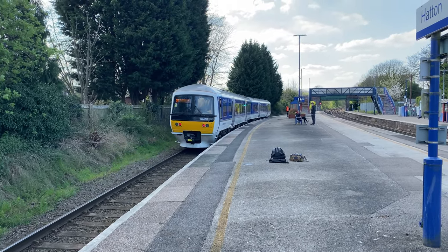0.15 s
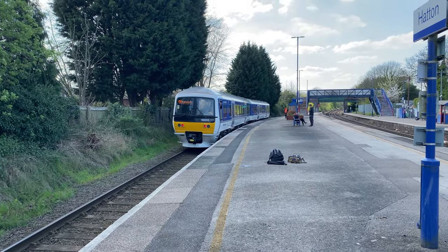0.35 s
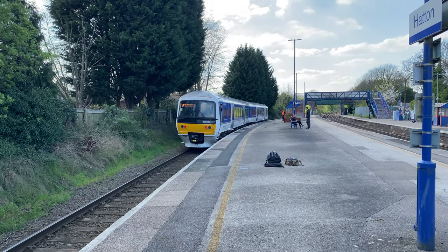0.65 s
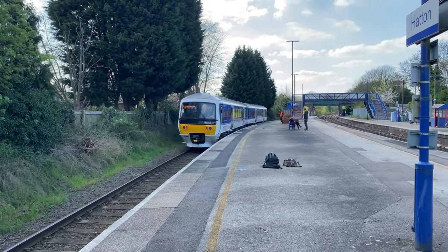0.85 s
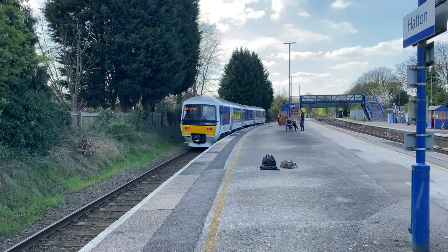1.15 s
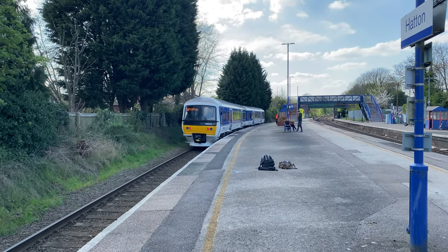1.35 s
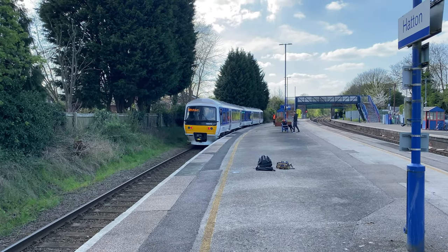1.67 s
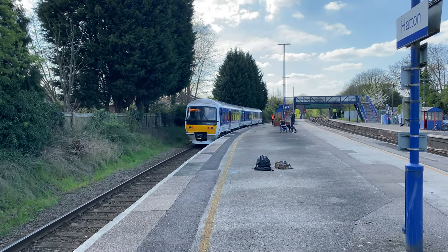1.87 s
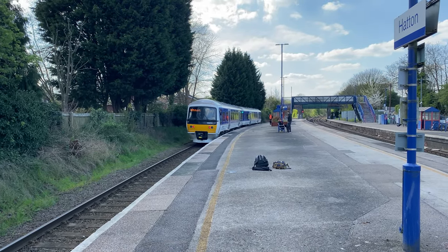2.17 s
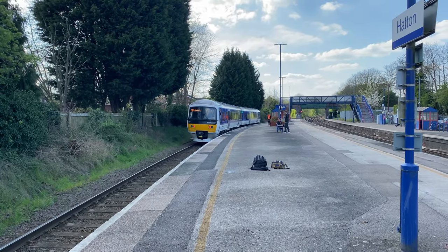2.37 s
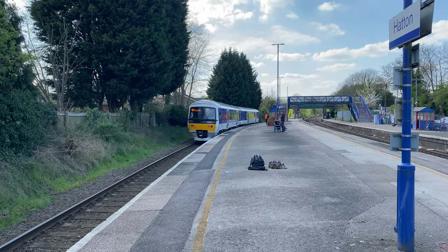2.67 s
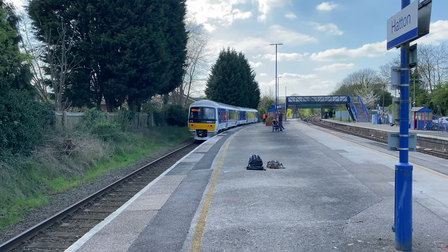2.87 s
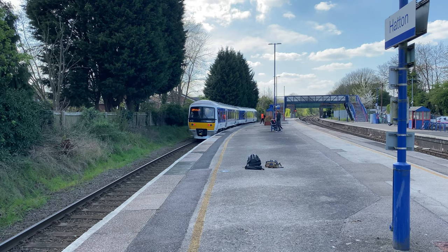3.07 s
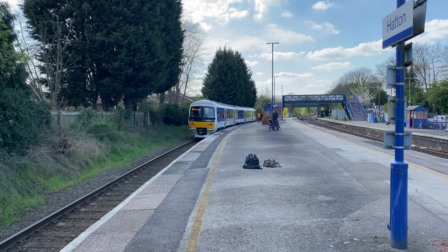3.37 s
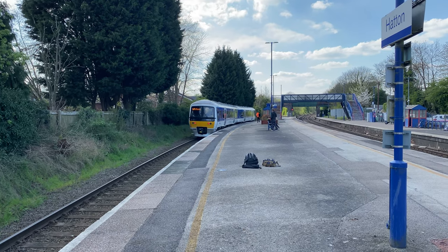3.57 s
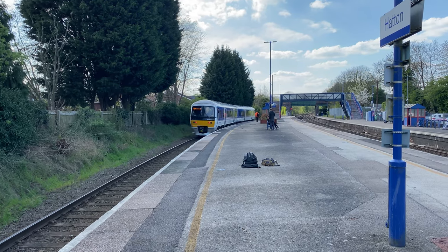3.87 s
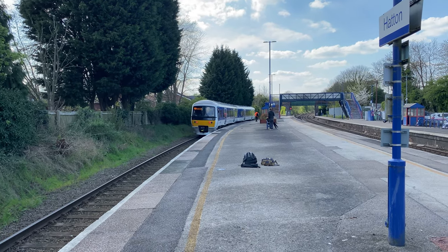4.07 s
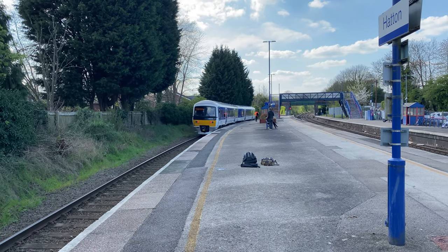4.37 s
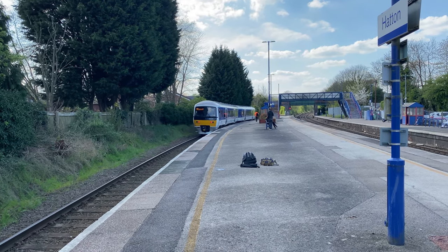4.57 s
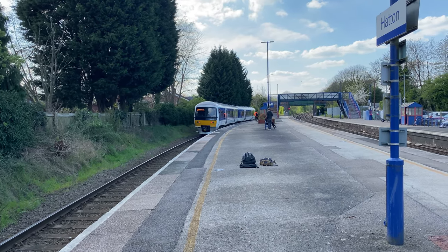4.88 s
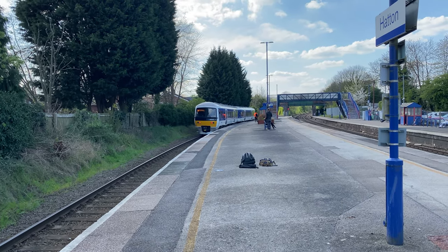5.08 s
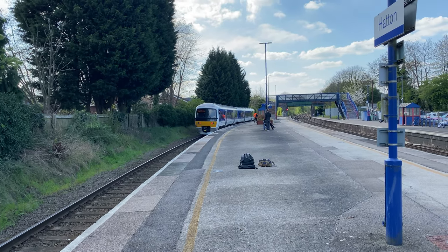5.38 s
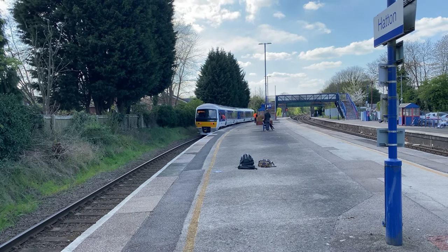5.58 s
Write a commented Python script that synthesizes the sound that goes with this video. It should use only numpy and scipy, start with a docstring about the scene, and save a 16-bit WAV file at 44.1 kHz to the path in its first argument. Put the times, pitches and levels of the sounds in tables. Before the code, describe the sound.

Outdoors on a country station platform, a diesel railcar moves away at steady speed, its wheel roar, deep engine drone and thin wavering gear tones slowly fading. Wind gusts thump the handheld stereo microphone from the start. Soft flange hisses swell in the curve, a faint bird whistles a run of notes, and near the end buffets and dull knocks crowd together with slight hand scuffs.

```python
"""A diesel railcar draws away from a country platform at steady speed: wheels roar, engine and gears sing
in thin lines; these and the upper engine orders fade, while the deep drone follows the bass swells.
From the start short gusts and buffets throb on the microphone; dull knocks join them, flanges hiss in the
curve, a bird whistles a run of notes and others peep. Near the end buffets and knocks crowd together and
a hand brushes the casing. Noise is coloured band by band; pulses and tones are enveloped sines."""
import sys
import numpy as np
from scipy import signal
from scipy.fft import rfft, irfft, next_fast_len
from scipy.io import wavfile
from scipy.ndimage import uniform_filter1d

SR = 44100
rng = np.random.default_rng(int(sys.argv[2]) if len(sys.argv) > 2 else 0)


def pcm_store(signal):
    """Save signal as 16-bit PCM."""
    levels = np.round(np.clip(np.atleast_2d(signal), -1, 1) * 32767)
    wavfile.write(sys.argv[1], SR, levels.astype(np.int16).T)


N = 252693
TIME = np.arange(N) / SR
SIZE = next_fast_len(N, True)
BINS_HZ = np.maximum(np.arange(SIZE // 2 + 1) * SR / SIZE, 1)


def from_db(db):
    """Decibels to gain."""
    return 10 ** (np.asarray(db) / 20)


def rms_one(x):
    """Scale to rms 1."""
    return x / np.sqrt(np.mean(x ** 2) + 1e-20)


def at_hz(points):
    """A table over log frequency, read at every bin."""
    hz, value = np.transpose(points)
    return np.interp(np.log(BINS_HZ), np.log(hz), value)


def drift(rate_hz):
    """Slow chance with spread 1, changing about rate_hz times a second."""
    steps = rng.standard_normal(400)
    return rms_one(np.interp(TIME * 2 * rate_hz, np.arange(len(steps)), steps))


def swell(t, length):
    """A bell-shaped envelope with its crest at t = 0; length is two standard deviations."""
    return np.exp(-2 * (t / length) ** 2)


def panned(x, pan_db):
    """Share a sound between the channels; pan_db is left minus right."""
    return x * from_db(np.array([[1], [-1]]) * pan_db / 2)


def around(s):
    """The samples within a fifth of a second of s, and their times from s."""
    near = slice(max(int(s * SR) - SR // 5, 0), int(s * SR) + SR // 5)
    return near, TIME[near] - s


def random_bins():
    """The spectrum of fresh white noise."""
    return rng.standard_normal(2 * len(BINS_HZ)).view(complex)


def stereo_noise(gain, alike, lead_rad=0):
    """Coloured noise of rms 1; the ports share one part, which reaches the right one later in phase."""
    alike = np.clip(alike, 0, .99)
    shared = random_bins()
    own = random_bins()
    right = alike * shared * np.exp(-1j * lead_rad) + np.sqrt(1 - alike ** 2) * own
    return rms_one(irfft(gain * np.array([shared, right]), SIZE)[:, :N])


def from_the_track(gain):
    """Coloured noise from ahead left: partly direct, partly scattered by trees and platform."""
    # the train at the two ports: hz, likeness (-1..1)
    likeness = [(100, 0.75), (500, 0.76), (1000, 0.45), (1900, 0.44), (2600, 0.39), (4400, 0.61),
                (5800, 0.13), (7000, .65), (8300, 0.78), (10300, 0.51), (12000, 0.88)]
    # hz, left_minus_right_db
    lean = [(100, -1.5), (700, -1.5), (1350, -4.5), (2600, 1.1), (3500, -2), (4300, 0), (5200, -3),
            (7300, -2.5), (8800, -1), (10000, 2), (12000, 0)]
    # hz, left_lead_rad
    lead = [(100, -1.45), (500, 1.1), (1200, 1), (1500, 0.56), (2000, 0.24), (3200, 0.5), (4100, 0.84),
            (4800, -1.7), (5600, -3), (6400, 0.5), (7000, 0.5), (7800, 2.5), (9700, 3.5), (11700, 7)]
    return stereo_noise(panned(gain, at_hz(lean)), at_hz(likeness), at_hz(lead))


def wavering(x, depth_db=0.84, rate_hz=7, low_hz=400, count=8):
    """Moving air lets neighbouring quarter-octave bands come and go, each in its own way."""
    spectrum = rfft(x, SIZE)
    out = x
    for k in range(count):
        band = np.maximum(1 - np.abs(4 * np.log2(BINS_HZ / low_hz) - k), 0)
        change = from_db(depth_db * drift(rate_hz)) - 1
        out = out + irfft(spectrum * band, SIZE)[:, :N] * change
    return rms_one(out)


def wheels(distance_db, flutter_db=.5, air_hz=5300, air_loss=0.76, hiss_fade=0.97):
    """Rough treads shake wheels and rails; with distance the air takes the top of the hiss first."""
    # wheel and rail roar: hz, relative_db_per_hz
    roar_colour = [(30, -41), (70, 2.5), (110, 1), (170, -3.5), (235, -4.5), (330, -3), (520, -4),
                   (740, -1.5), (900, -6.5), (985, -4.5), (1160, -6.5), (1370, -14), (1530, -15.5),
                   (1820, -10.5), (2500, -25), (4000, -66)]
    # the hiss above it: hz, relative_db_per_hz
    hiss_colour = [(1300, -28.5), (2250, -2.5), (3300, 0.5), (4150, -5), (4650, -3), (5300, -9.5),
                   (6300, -10.5), (7400, -18.5), (8400, -21), (9400, -19), (10500, -27), (12500, -34.5),
                   (15500, -49)]
    roar_db, hiss_db = -41.5, -57   # rms at the starting distance
    # a little louder through the tightest part of the curve
    curve_s, curve_length_s, curve_db = 2.5, 1.1, 0.67

    boost_db = curve_db * swell(TIME - curve_s, curve_length_s)
    roar = wavering(from_the_track(from_db(at_hz(roar_colour))))
    roar = roar * from_db(roar_db + distance_db + boost_db + flutter_db * drift(18))
    hiss = from_the_track(from_db(at_hz(hiss_colour)))
    hiss = hiss * from_db(hiss_db + hiss_fade * distance_db)
    high_pass = signal.butter(2, air_hz, "high", fs=SR, output="sos")
    top = signal.sosfiltfilt(high_pass, hiss)
    return roar + hiss - top * (1 - from_db(air_loss * distance_db))


def flanges(alike=0.73, left_lag_s=5.6e-5, pan_db=-1.0, chatter_db=1.0):
    """Each rub of flange on rail swells as high hiss, chattering as it grips and slips; right port first."""
    # rubs in the curve: crest_s, level_db, length_s, treble_db
    rubs = [(0.953, -66, 0.44, -6), (1.918, -58, 0.31, -1), (3.29, -58.5, 0.26, -13),
            (3.58, -63.5, 0.29, -11), (4.392, -69, 0.11, -4), (4.598, -68, 0.23, -11)]
    # hiss colour: hz, relative_db_per_hz
    rub_colour = [(1700, 1), (3300, -3), (4150, -7), (4650, 3), (5100, 1), (5400, -3.5), (5660, 2.5),
                  (5950, -6), (6400, -5), (6900, -14.5), (7500, -7), (8400, -15), (9400, -16.5),
                  (12000, -35.5), (15000, -52)]
    # where the treble setting acts: hz, share of treble_db (0..1)
    treble_share = [(5750, 0), (6000, 1), (8200, 0.83), (9100, .3), (11000, .8)]
    lead_rad = -2 * np.pi * BINS_HZ * left_lag_s
    out = np.zeros((2, N))
    for s, db, length_s, treble_db in rubs:
        gain = from_db(at_hz(rub_colour) + treble_db * at_hz(treble_share))
        out += stereo_noise(gain, alike, lead_rad) * from_db(db) * swell(TIME - s, length_s)
    return panned(out * from_db(chatter_db * drift(20)), pan_db)


def engines(bass_db, distance_db, wander=0.01203, shimmer_db=1.5, fade=0.51, pan_db=-1.0):
    """Exhaust drones on orders of the firing rate; deep ones follow the bass, the top three fade away."""
    # drone: multiple_of_firing_rate, rms_db, share_of_bass_swells (0..1)
    orders = [(0.499, -51, 1), (0.752, -46, 0.99), (1, -44.5, 0.62), (1.499, -60.5, 0.33), (2, -56.5, 0.43),
              (4, -65, 0.029)]
    firing_hz = 78.67
    turns = np.cumsum(firing_hz * (1 + wander * drift(3.04))) / SR
    drone = np.zeros(N)
    for multiple, db, follows in orders:
        level_db = db + follows * bass_db + (0.5 - follows) * fade * distance_db
        level_db = level_db + shimmer_db * drift(2.5)
        drone += from_db(level_db) * np.sin(2 * np.pi * (multiple * turns + rng.random()))
    return panned(np.sqrt(2) * drone, pan_db)


def thin_lines(distance_db, wander=.012, waver_db=6.5, fade=1.3, alike=.8, lead_rad=1.0, pan_db=-1.0):
    """Engine and gears sing in thin lines that waver, come and go in moving air and fade with distance."""
    # lines: pitch_hz, rms_db at the starting distance
    lines = [(307, -55.5), (393, -55), (685, -55), (790, -57), (1034, -60.5), (1130, -66.5), (1770, -74.5)]
    out = np.zeros((2, N))
    for hz, db in lines:
        phase = 2 * np.pi * np.cumsum(hz * (1 + wander * drift(9))) / SR
        scatter_rad = (1 - alike) * 2 * np.pi * drift(6)
        tone = np.sin([phase, phase - lead_rad + scatter_rad])
        out += from_db(db + fade * distance_db) * rms_one(from_db(waver_db * drift(7)) * tone)
    return panned(out, pan_db)


def gusts(lead_rad=1.21, lead_spread_rad=0.74, pan_db=-2.0):
    """A short gust pushes and pulls on the ports for a few cycles, a little out of step between them."""
    # deep pressure bursts: crest_s, peak_db, pitch_hz, length_s
    bursts = [(0.039, -17.5, 67, 0.025), (0.104, -25.5, 72, 0.012), (0.142, -23, 63.5, 0.015),
              (0.301, -36, 62, 0.014), (0.447, -31, 59.6, 0.015), (0.554, -27, 63.5, 0.013),
              (0.614, -24, 69.3, 0.0082), (0.704, -29.5, 72, 0.064), (1.576, -30, 66, 0.012),
              (1.628, -29, 63.4, .025), (1.676, -29.5, 56, 0.033), (2.731, -28.5, 64.4, 0.029),
              (2.782, -33, 62, 0.018), (2.88, -22.5, 63, 0.025), (2.984, -29, 66, .016),
              (3.042, -24, 61, 0.015), (3.144, -28, 66.5, 0.023), (3.211, -29, 57, 0.021),
              (3.299, -26, 72, 0.02), (3.361, -27, 63, 0.014), (3.404, -27, 71, 0.027),
              (3.589, -21, 65, 0.011), (3.82, -30, 70, 0.01), (3.978, -29, 64, 0.016),
              (4.078, -29, 60, 0.014), (4.135, -33, 67.3, 0.036), (4.226, -32, 64.3, 0.014),
              (4.382, -29.5, 62, 0.029), (4.584, -30, 62.3, 0.014), (4.682, -26, 57.64, 0.036),
              (4.82, -31, 66, .018), (4.872, -21.5, 80, 0.019), (4.903, -17, 72, 0.012),
              (4.99, -19, 83, 0.018), (5.013, -17.5, 80, 0.0099), (5.034, -19, 74, 0.0073),
              (5.09, -15.5, 72.7, 0.0092), (5.109, -20, 86, 0.0091), (5.158, -21, 68.4, 0.0063),
              (5.194, -26.5, 56.3, 0.031), (5.235, -25.5, 52.1, 0.049), (5.506, -35, 65, .012),
              (5.543, -33, 80.8, 0.01), (5.606, -32, 75, .012), (5.645, -29.5, 85, 0.015)]
    out = np.zeros((2, N))
    for (s, db, hz, length_s), (turn, skew) in zip(bursts, rng.random((len(bursts), 2))):
        near, t = around(s)
        phase = 2 * np.pi * (hz * t + turn)
        right = phase - lead_rad - lead_spread_rad * (2 * skew - 1)
        out[:, near] += from_db(db) * swell(t, length_s) * np.sin([phase, right])
    return panned(out, pan_db)


def eddy(t, centre_hz, length_s):
    """A ragged burst of turbulence in both channels, shifted in phase; rms about 1 at its crest."""
    width_octaves, lead_rad = 1.22, 1.71
    tail = 1.28   # dies this much slower than it builds
    ragged_db, ragged_s = 3, .007   # depth and grain of the flutter
    edges_hz = centre_hz * 2 ** (np.array([-.5, .5]) * width_octaves)
    band = signal.butter(3, edges_hz, "band", fs=SR, output="sos")
    noise = signal.sosfilt(band, rng.standard_normal(SR // 2))
    turbulence = signal.hilbert(noise)[-len(t):]
    grain = np.interp((t - t[0]) / ragged_s, np.arange(200), rng.uniform(-1, 1, 200))
    envelope = swell(np.where(t > 0, t / tail, t), length_s) * from_db(ragged_db * grain)
    burst = envelope * turbulence
    pair = np.real([burst, burst * np.exp(-1j * lead_rad)])
    return rms_one(pair) * np.sqrt(np.mean(envelope ** 2))


def buffets(breakup_db=-18.0, breakup_ratio=2.5, breakup_share=0.69):
    """A big eddy thumps on the ports and at its crest breaks up into a shorter, higher flutter."""
    # big eddies: crest_s, level_db, centre_hz, length_s, left_minus_right_db
    big_eddies = [(.021, -35, 141, 0.0086, -2), (.089, -33.5, 145, .012, 0), (.59, -36.5, 140, 0.032, 4),
                  (0.706, -36, 140, 0.012, 0), (.741, -25, 143, .009, -5), (0.8, -42, 217, 0.11, 2),
                  (.82, -34.5, 150, 0.0094, -2), (1.233, -39, 108, 0.023, -2),
                  (1.468, -35.5, 324, 0.037, 0), (1.518, -41, 282, 0.039, 3), (1.78, -34, 134, 0.017, -3),
                  (2.061, -41.5, 149, 0.029, 2), (2.135, -35.5, 115, 0.03, -3), (2.238, -53, 283, 0.077, 1),
                  (3.42, -42.5, 130, 0.063, -3), (3.512, -38, 135, 0.0093, -5),
                  (3.55, -34.5, 144.5, 0.0077, 1), (3.594, -38, 140, 0.0099, -4), (3.7, -43, 170, 0.029, 0),
                  (3.82, -44, 129, 0.02, -1), (4.887, -34.5, 180, 0.017, 1), (5.0, -26.5, 150, .012, -3),
                  (5.045, -35, 159, 0.021, 2), (5.08, -30, 144, 0.029, -1), (5.372, -38.5, 161, 0.04, -1.5)]
    out = np.zeros((2, N))
    for s, db, centre_hz, length_s, pan_db in big_eddies:
        near, t = around(s)
        thump = eddy(t, centre_hz, length_s)
        flutter = from_db(breakup_db) * eddy(t, centre_hz * breakup_ratio, length_s * breakup_share)
        out[:, near] += panned(from_db(db) * (thump + flutter), pan_db)
    return out


def taps(settle_hz=140, glide_s=0.00335, lead_rad=2.02):
    """A knock is one short pressure pulse whose lows arrive last, so its pitch drops in a few cycles."""
    # dull knocks of wind and fingers on the casing:
    # start_s, peak_db, start_hz, rise_s (half the time to the crest), left_minus_right_db
    knocks = [(.729, -22.5, 330, 0.003, -9), (.773, -24, 380, 0.0015, 0), (0.846, -30, 422, 0.0027, 1),
              (1.463, -33, 566, 0.0012, 7), (1.472, -28, 557, 0.0025, 0), (1.764, -29.5, 260, 0.0018, -4),
              (1.777, -26, 267.7, 0.003, 1.5), (2.058, -30, 302, 0.0019, -5), (2.121, -33, 360, 0.0014, -2),
              (2.155, -31, 330, 0.0019, 1), (4.847, -26.5, 400, 0.002, -3), (4.878, -29, 450, 0.0028, -5),
              (4.891, -25, 552, 0.0026, -3), (4.978, -16, 200, .0022, -1.5), (4.985, -22.5, 880, 0.0017, 1),
              (4.995, -13, 510, 0.0014, -1.5), (5.007, -17, 190, .0022, -6), (5.032, -25, 377, 0.0018, 0),
              (5.044, -31, 500, 0.0026, -9), (5.061, -21, 660, 0.003, 0), (5.068, -17.5, 328, 0.003, -2),
              (5.09, -24.5, 258, 0.0024, 0), (5.102, -18.5, 638, 0.0027, -1.5),
              (5.114, -24, 260, 0.0029, 1), (5.126, -27.5, 380, 0.0011, -6),
              (5.149, -28.5, 340, 0.0025, -1), (5.335, -18.5, 1070, 0.0023, -3),
              (5.345, -30.5, 480, 0.0011, 2), (5.354, -28, 258, .002, -4), (5.371, -29.5, 640, 0.0011, -2),
              (5.423, -30, 600, 0.0016, -2), (5.444, -36, 600, 0.0012, -1), (5.522, -34, 470, 0.0015, -.5),
              (5.53, -39, 620, 0.001, 3), (5.634, -32.5, 450, 0.0018, 0), (5.646, -28.5, 559, 0.002, -0.5)]
    out = np.zeros((2, N))
    for s, db, start_hz, rise_s, pan_db in knocks:
        near, t = around(s)
        t = np.maximum(t, 0)
        glide = (start_hz - settle_hz) * glide_s * (1 - np.exp(-t / glide_s))
        phase = 2 * np.pi * (settle_hz * t + glide)
        envelope = (t / (2 * rise_s)) ** 2 * np.exp(2 - t / rise_s)
        out[:, near] += panned(from_db(db) * envelope * np.sin([phase, phase - lead_rad]), pan_db)
    return out


def hand(alike=.1):
    """Skin slips on the casing in brief, bright scuffs."""
    # scuffs: crest_s, level_db, length_s, left_minus_right_db, top_hz
    scuffs = [(4.97, -65, 0.019, -8, 13000), (5.605, -56.5, 0.0011, -4, 15000),
              (5.624, -68, 0.022, -5, 8000)]
    # friction colour: hz, relative_db_per_hz
    friction_colour = [(2500, -1), (4700, 5), (6500, -6), (8200, -7), (10000, -14), (13000, -13),
                       (15000, -24)]
    friction = stereo_noise(from_db(at_hz(friction_colour)), alike)
    out = np.zeros((2, N))
    for s, db, length_s, pan_db, top_hz in scuffs:
        near, t = around(s)
        soften = signal.butter(4, top_hz, fs=SR, output="sos")
        envelope = panned(from_db(db) * swell(t, length_s), pan_db)
        out[:, near] += signal.sosfilt(soften, friction[:, near]) * envelope
    return out


def bird(start_hz=5650, end_hz=5050, glide_s=0.049, note_s=0.034, pan_db=8.0, count=7):
    """A run of evenly spaced, equally loud thin whistles, each sliding down towards the same pitch."""
    song_start_s, note_gap_s, song_db = 2.058, .152, -75
    song = np.zeros(N)
    for k in range(count):
        near, t = around(song_start_s + k * note_gap_s)
        pitch_hz = end_hz + (start_hz - end_hz) * np.exp(-np.maximum(t, 0) / glide_s)
        tone = np.sin(2 * np.pi * np.cumsum(pitch_hz) / SR)
        song[near] += from_db(song_db) * swell(t - note_s, note_s) * tone
    # it comes from the side, so the ports hear it half a cycle apart
    return panned(song * np.array([[1], [-1]]), pan_db)


def chirps(length_s=0.038, alike=0.96):
    """Short peeps of other birds, each scattered into a narrow band by the trees."""
    # single calls: crest_s, rms_db, centre_hz, width_hz
    calls = [(2.55, -69, 4545, 170), (4.24, -84, 7400, 1100), (4.37, -84, 7280, 1100),
             (4.57, -87, 7210, 1100)]
    out = np.zeros((2, N))
    for s, db, hz, width_hz in calls:
        call = stereo_noise(swell(BINS_HZ - hz, width_hz), alike)
        out += from_db(db) * swell(TIME - s, length_s) * call
    return out


def bass_level():
    """Each swell of engine drone and wind rumble rises, holds and drops to a slowly sinking calm; dB."""
    # deep bass swells: start_s, end_s, level_db
    swells = [(0.01, 0.82, -2), (1.54, 1.75, -1), (2.07, 2.153, -6.5), (2.777, 4.59, -3),
              (4.686, 4.88, -1.5), (5.01, 5.227, -1.5), (5.628, 5.734, -6.5)]
    calm_db, calm_fall_db_per_s = -9, 0.9
    rise_s, fall_s = 0.063, 0.049
    gains = []
    for start_s, end_s, db in swells:
        rise = swell(np.minimum(TIME - start_s, 0), 2 * rise_s)
        fall = swell(np.maximum(TIME - end_s, 0), 2 * fall_s)
        gains.append(from_db(db) * rise * fall)
    calm = from_db(calm_db - calm_fall_db_per_s * TIME)
    return 20 * np.log10(np.maximum(np.max(gains, axis=0), calm))


def breeze(wind, alike=0.7, lead_rad=0.31, lump_s=0.024, surge_db=1.7, pan_db=-1.7):
    """Lumpy pressure on the ports, its strength following the wind."""
    # wind rumble: hz, relative_db_per_hz
    rumble_colour = [(8, -58), (20, -29), (28, -12), (38, 9.5), (60, 7.5), (82, 5.5), (100, 0), (118, -6),
                     (160, -8.5), (250, -26.5), (450, -53.5), (2000, -110)]
    rumble = stereo_noise(from_db(at_hz(rumble_colour)), alike, lead_rad)
    power = np.mean(rumble ** 2, axis=0)
    for _ in range(2):
        power = uniform_filter1d(power, max(int(lump_s * SR), 2))
    levelled = rumble / np.sqrt(power + 1e-20)
    return panned(levelled * wind * from_db(surge_db * drift(6.2)), pan_db)


def small_eddies(wind, spread_db=1.5, spread_octaves=0.26, pan_db=-4.0):
    """Light bumps ride on the wind, each with its own strength and pitch."""
    eddies_per_s, base_db, base_hz, length_s = 8, -16.5, 115, .035   # base_db is relative to the wind
    out = np.zeros((2, N))
    for when, size, pitch in rng.random((int(eddies_per_s * N / SR), 3)):
        at = int(when * N)
        near, t = around(TIME[at])
        gain = wind[at] * from_db(base_db + spread_db * (2 * size - 1.5))
        centre_hz = base_hz * 2 ** (spread_octaves * (2 * pitch - 1))
        out[:, near] += gain * eddy(t, centre_hz, length_s)
    return panned(out, pan_db)


def scene():
    """Wheels, thin lines and upper engine orders fade with distance; wind and hand act at the microphone."""
    start_m, speed_m_per_s, ground_loss_db_per_m = 71.6, 15.9, 0.02
    rumble_db = -36.5   # wind at a bass level of 0 dB
    travelled_m = speed_m_per_s * TIME
    # spreading and ground loss
    distance_db = -20 * np.log10(1 + travelled_m / start_m) - ground_loss_db_per_m * travelled_m
    bass_db = bass_level()
    wind = from_db(rumble_db + bass_db)
    train = wheels(distance_db) + flanges() + engines(bass_db, distance_db) + thin_lines(distance_db)
    at_the_ports = gusts() + buffets() + taps() + hand()
    return train + at_the_ports + bird() + chirps() + breeze(wind) + small_eddies(wind)


def record(dry, low_cut_hz=24, cutoff_hz=15600):
    """The microphone sheds the deepest bass; a steep low-pass cuts the top."""
    high_pass = signal.butter(2, low_cut_hz, "high", fs=SR, output="sos")
    low_pass = signal.ellip(10, .1, 80, cutoff_hz, fs=SR, output="sos")
    return signal.sosfilt(low_pass, signal.sosfilt(high_pass, dry))


dry = scene()
out = record(dry)
pcm_store(out)
```